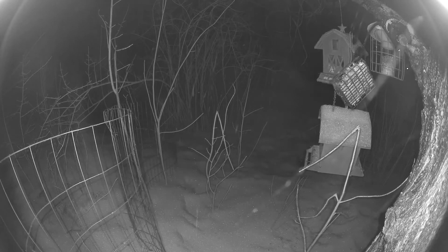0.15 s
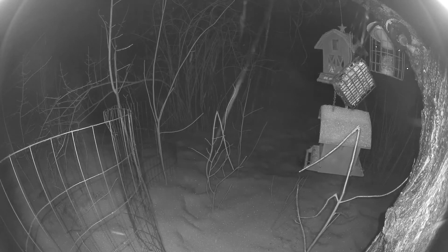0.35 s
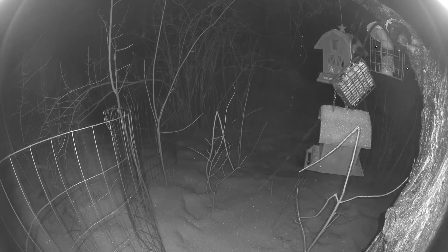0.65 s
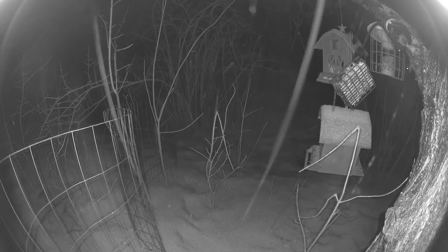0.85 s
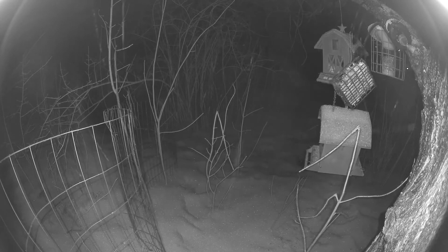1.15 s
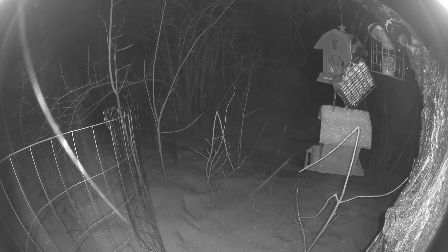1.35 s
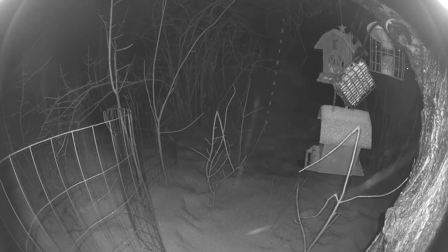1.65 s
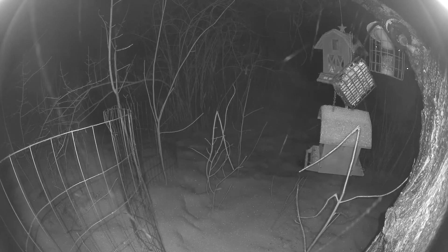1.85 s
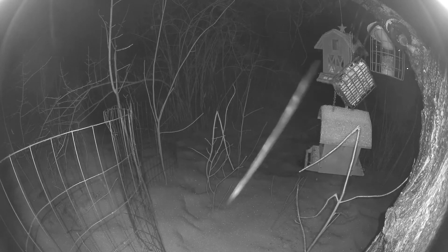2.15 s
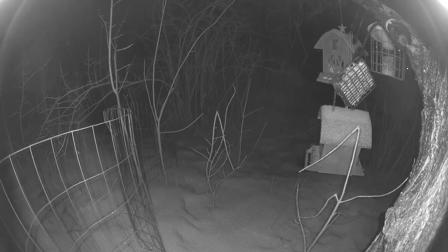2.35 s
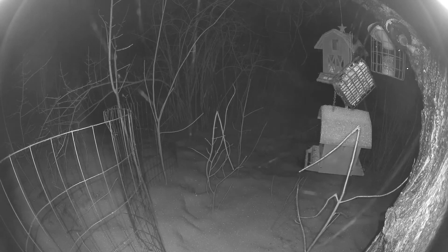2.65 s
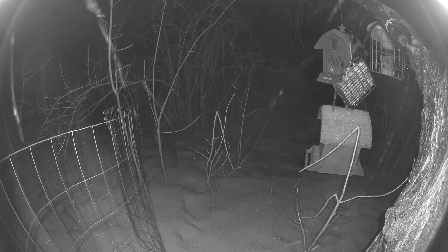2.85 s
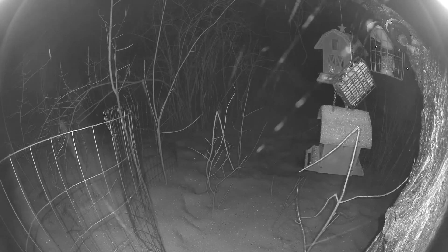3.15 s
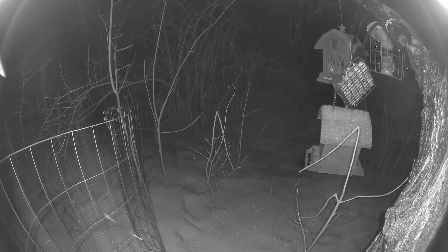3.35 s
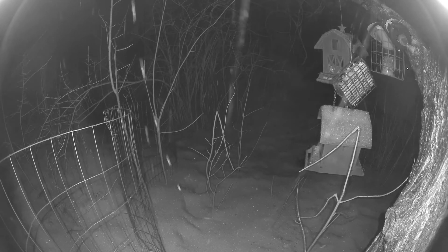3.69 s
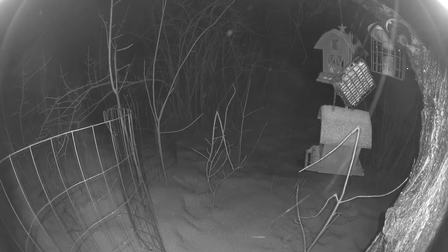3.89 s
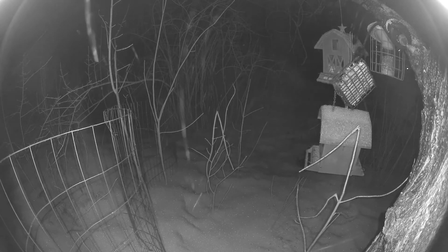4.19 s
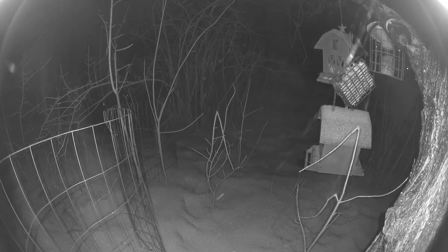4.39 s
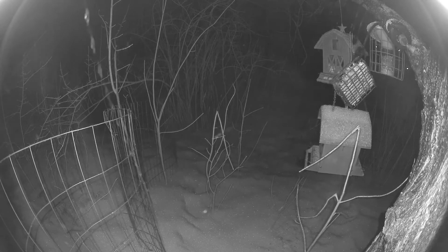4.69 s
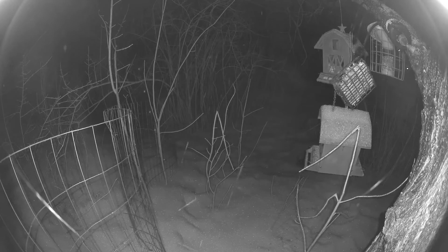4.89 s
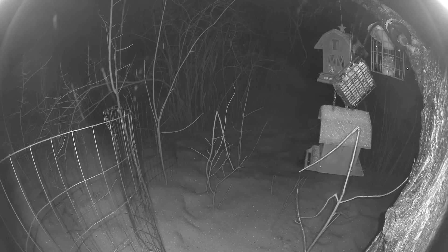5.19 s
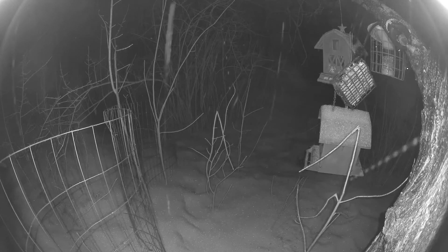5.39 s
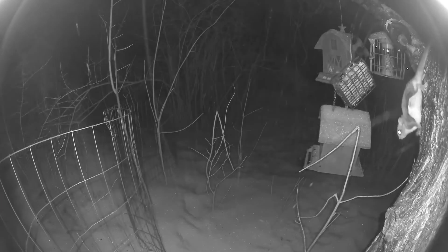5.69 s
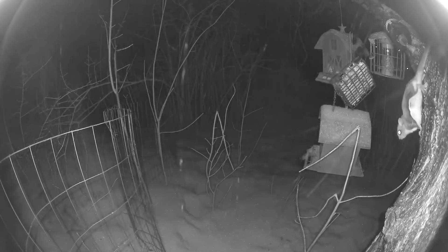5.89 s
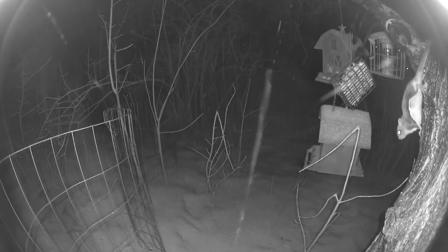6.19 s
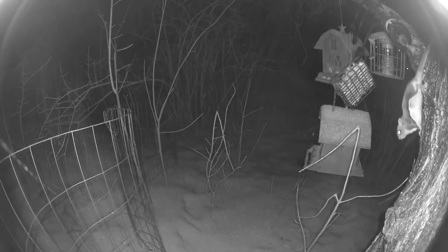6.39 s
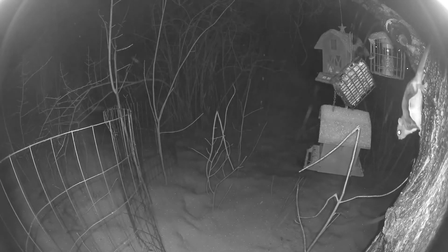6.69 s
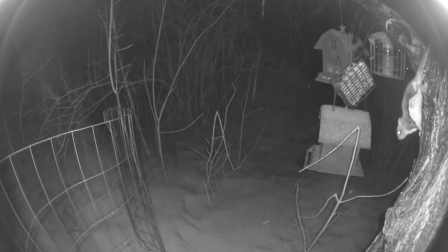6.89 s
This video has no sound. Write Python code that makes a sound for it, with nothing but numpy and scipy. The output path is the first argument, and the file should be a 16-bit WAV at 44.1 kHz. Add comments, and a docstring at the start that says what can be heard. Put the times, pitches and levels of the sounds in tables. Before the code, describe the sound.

A night yard in sleet, heard from a small outdoor camera microphone, mono and dull at the top. From the start, hard pellets tick on the plastic housing at uneven intervals, each a tiny bright crack with a short hollow ring. A strong one lands near 0.2 s and another at 1.7 s; a sparser moment follows around 2 s. Loud, snapping hits come at 2.9 s and between 3.2 and 3.6 s, then mostly lighter ticks until 5.4 s. Soft dull pats and faint taps fall nearby over muffled hiss and low distant rumble, the hiss opening briefly after ticks. At 5.4 s everything goes silent for half a second. At 5.9 s the hiss returns louder, with a low roar joining the rumble, and eases after about half a second. Sharp ticks cluster at 6.1 to 6.4 s, then lighter ones continue to about 6.75 s, leaving the steady background at the end.

```python
"""Outdoors at night, sleet ticks on the plastic housing of a camera; softer pellets pat on things nearby.
Ticks, pats and faint taps are resonances driven by short bursts. Behind them lie a low, distant rumble and the
hiss of sleet in the trees, both shaped noise. The camera's noise suppressor turns the treble down, but lets it
through for a moment after each tick. The sound cuts out once for half a second; then the hiss comes back louder
and settles, and the noise just above the rumble stays louder from then on."""
import sys
import numpy as np
from scipy import signal
from scipy.fft import rfft, irfft, next_fast_len
from scipy.io import wavfile
from scipy.ndimage import uniform_filter1d, minimum_filter1d, map_coordinates

SR = 44100
rng = np.random.default_rng(int(sys.argv[2]) if len(sys.argv) > 2 else 0)


def wrap_up_sound(samples):
    """Save the sound to the file named by the first command line argument, as 16-bit audio."""
    columns = np.atleast_2d(samples).T
    # keep every value between -1 and 1, then stretch to whole-number steps
    tamed = np.clip(columns, -1, 1)
    steps = np.round(tamed * 32767).astype(np.int16)
    wavfile.write(sys.argv[1], SR, steps)


N = 310464  # length in samples
TIME = np.arange(N) / SR  # seconds

# when the sound cuts out: start_s, end_s
SILENCE = (5.403, 5.915)


def amp(db):
    """Turn decibels into a gain."""
    return 10 ** (np.asarray(db) / 20)


def unit(x):
    """Scale to an rms (average strength) of 1."""
    return x / np.sqrt(np.mean(x ** 2) + 1e-20)


def match_energy(sound):
    """Give a short sound the energy of 2 ms at rms 1."""
    return sound * np.sqrt(.002 * SR / np.sum(sound ** 2))


def wobble(rate):
    """A smooth random curve through `rate` random points a second."""
    points = rng.standard_normal(int(N * rate / SR) + 4)
    return map_coordinates(points, [TIME * rate])


def filtered(x, response):
    """Multiply each frequency of x by the gain that response(hz) gives."""
    padded = next_fast_len(N + 8192)
    hz = np.fft.rfftfreq(padded, 1 / SR)
    return irfft(rfft(x, padded) * response(hz), padded)[..., :N]


def coloured(x, spectrum):
    """Shape x to a curve of (pitch_hz, level_db) points, at rms 1."""
    points_hz, points_db = np.transpose(spectrum)

    def response(hz):
        return amp(np.interp(np.log(hz + 1), np.log(points_hz), points_db))
    return unit(filtered(x, response))


def ring(push, hz, width_hz, order=2):
    """A resonance answers a push near its own pitch; a narrower one rings longer."""
    edges = np.clip([hz - width_hz / 2, hz + width_hz / 2], 50, SR / 2 - 50)
    b, a = signal.butter(order, edges, "bandpass", fs=SR)
    return match_energy(signal.lfilter(b, a, push))


def add(track, s, sound):
    """Mix a sound into the track at time s (seconds)."""
    part = track[max(round(s * SR), 0):][:len(sound)]
    part += sound[:len(part)]


def ticks():
    """Each pellet that hits the housing drives its parts by an amount set by the landing spot."""
    # pellets on the housing: start_s, contact_s, ping_hz, wall_hz (pitch of the wall at that spot), level_db,
    # then the drive of each part over the ping: back_db, cavity_db, side_db, wall_db, front_db, rim_db
    pellets = [(0.0901, 0.00023, 6920.0, 3950.0, -38.5, -20.5, -27.5, -30, -10.5, -1, -5),
               (0.1276, 0.0015, 5710.0, 4220, -35, -6.5, -8.5, -6.0, -6, -20.5, -35.5),
               (0.1872, 0.0015, 5700.0, 4080, -27, -30.5, -12, -11.5, -12, -4, -22),
               (0.1927, 0.00095, 6570.0, 4210, -13.5, -33, -12.5, -23, -18.5, -18.5, -16.5),
               (0.225, 0.002, 6300, 4500, -44, -16, -7.5, -1, 0, 2.5, -6),
               (0.367, 0.0007, 6970.0, 4370, -24.5, -19, -10, -15.5, -6, -2.5, -3.5),
               (0.4403, 0.003, 6030.0, 4320, -39.5, -24, -2.5, -6.0, 7.5, -11, 2.5),
               (0.7455, 0.00051, 6970.0, 3950, -27.5, -31, -7, -9, -12, -8.0, -0.5),
               (0.773, 0.0003, 5600.0, 4900.0, -44.5, -28, -16.0, -27, 8, 8.5, -13.5),
               (0.8313, 0.002, 6270.0, 4330.0, -37.0, -5.0, -14.5, -15, -1.5, 0, 4.5),
               (0.908, 0.001, 5600.0, 3840.0, -47, -17, -21.5, -29.0, -6, -13.0, 10.5),
               (1.0253, 0.00086, 5720.0, 4320, -24.5, -29, -27, -25, -9.0, -3, -10),
               (1.1355, 0.0015, 7080.0, 3320, -44, -19.5, -24, -30, -2.5, 4.5, 3),
               (1.199, 0.0021, 6540.0, 4000.0, -34, -1, 2, -6.5, 3, -2.5, -31),
               (1.521, 0.0034, 5900, 4300, -41, 6, -1, 1, -2.5, 1.5, -9.5),
               (1.7167, 0.0017, 5960.0, 4020, -18.5, -26, 0, -8.5, 6, 1, 2),
               (1.7961, 0.0017, 5900.0, 3520, -37.0, -30.5, -9.5, -24.0, -2, -7, -1),
               (1.8502, 0.0015, 6860.0, 4290, -23, -18.5, -17, -15.5, -10.5, -2.0, 4),
               (1.941, 0.0038, 6500, 4200, -37, 0.5, 0.5, 2.5, 4, -8, -8.5),
               (2.5834, 0.0015, 6990.0, 4800, -44, -24.0, -10, -23, -5, -25.5, 1),
               (2.6151, 0.0014, 6620.0, 4500, -25.5, -32, -18, -18.5, -3, -14, -19),
               (2.7162, 0.00076, 6460.0, 3530.0, -33, -23.5, -28, -30.5, -13.5, -3.5, -3.5),
               (2.794, 0.0011, 5970.0, 3990.0, -34.5, -32.0, -6.5, -11.5, -2, 6, 0.5),
               (2.8761, 0.00091, 6510.0, 4050, -6.5, -25.5, -18, -9.5, -1, -1.5, -32.5),
               (2.8822, 0.00063, 6840.0, 3390.0, -12.5, -20, -8, -16.0, 2, 8, 8.5),
               (2.9554, 0.00061, 5740.0, 4230, -31.5, -35, -0.5, -10.5, 6.5, -2, -8),
               (3.0804, 0.002, 5770.0, 3780, -28.5, -33, -8, -19, -2, -19.5, -8),
               (3.1319, 0.0017, 6170.0, 4060, -24, -22, -14.5, -29, -10, -9, 1.5),
               (3.1908, 0.0014, 5600.0, 4040, -14.0, -24.0, -3.5, -32, 1.5, -11.5, -31),
               (3.2724, 0.0015, 6870.0, 4130, -22, -29.5, -26, -26, -11.0, -7.5, -31.5),
               (3.2982, 0.0003, 6480.0, 4900.0, -43.5, -31.5, -29, -32.0, -10.5, -7.5, -5.5),
               (3.3273, 0.00045, 6520.0, 5050, -9.5, -33.5, -25.5, -32, -6, -8, -30),
               (3.3687, 0.0007, 6370.0, 3730, -40, -21, -30, -30, -6, 0, -5.5),
               (3.556, 0.00086, 6300.0, 4150.0, -15.5, -30, -23.5, -35, -18, -31, -32.5),
               (3.5634, 0.0005, 5610.0, 3980.0, -33, -13.5, -13, -18, -3.5, -3, -16),
               (3.7212, 0.00064, 6600.0, 4746, -32.5, -33.5, -21.5, -31, -9, -10.5, -1.5),
               (3.7443, 0.00085, 5860.0, 4940, -29, -17, -19, -26, -12.5, -19, -7.5),
               (3.8444, 0.0022, 5880.0, 4790, -43.5, -31, -14.5, -18.5, 1, -21, 0),
               (4.088, 0.0037, 6200, 4010, -41.5, 3.5, 2.5, 3, 0, 3, -14.5),
               (4.2576, 0.001, 6330.0, 4120, -32, -13.5, -8, -3.5, -2, 5.5, 4),
               (4.3875, 0.0003, 5780.0, 4440.0, -35.0, -4.5, -28, -34, -10.5, 5.5, -4.5),
               (4.4756, 0.0015, 6680.0, 4630.0, -45, -10.5, -24.5, -30.0, -15.5, -32.5, -17.0),
               (4.69, 0.003, 5600.0, 3940, -29.5, 6, 9, -6.0, 1, 8, -14),
               (4.8316, 0.00028, 6830.0, 3300.0, -37, -9.5, -1, -11, -5.5, -4, -1.5),
               (4.9334, 0.0023, 6640.0, 4400, -36, -30, -3, -5, 1.5, 3, -16.5),
               (4.959, 0.001, 7030.0, 4360.0, -20, -27.5, -12.5, -18.0, -7.5, -21.5, 1),
               (5.1206, 0.003, 6080.0, 4290.0, -36.5, -32.0, -2.5, -1.5, 1.5, -4.5, 1.5),
               (5.1955, 0.00054, 5820.0, 4230, -17.5, -16, 10.5, -16.5, 14, 1.5, 2.5),
               (5.234, 0.0003, 7090.0, 4380.0, -43, -30.5, -2, 2.5, 3.5, -10.5, -6),
               (5.3187, 0.0018, 7020.0, 3320, -37.5, 1.5, 12.0, 4.5, 5.5, 8.5, -3),
               (5.3892, 0.001, 5600.0, 4770, -29, -11.5, 1.5, -13, 3, -13, -8.5),
               (5.9204, 0.00046, 6190.0, 4180.0, -33, -3.5, 4, -6.0, 2.5, -0.5, -13),
               (6.1289, 0.0011, 6340.0, 3900.0, -14, -27, -16.5, -21, -15.5, -8, -31),
               (6.2002, 0.001, 5870.0, 4010.0, -14.5, -33, -2, -21.0, -4, -4, -3.5),
               (6.2041, 0.00041, 6910.0, 4170, -15, -22.5, -16.5, -12, -1, 9, 0),
               (6.2577, 0.00089, 7000.0, 3520, -17, -30.0, -6.5, -7.5, 1.5, 11, 12.5),
               (6.3021, 0.0014, 6930.0, 3890.0, -35.5, -20.0, -24, -29, 5, -34.5, 3.5),
               (6.359, 0.002, 6260.0, 4220, -15.5, -4.5, -2.5, -4, 0, 6.5, 3.5),
               (6.474, 0.00038, 6050.0, 4620, -29.5, -27, -33, -32.5, -5, -21, -32.0),
               (6.492, 0.0015, 6330.0, 3973, -29.5, -34, -27.5, -31.5, -1, -9.5, -18),
               (6.5036, 0.0017, 6580.0, 4100, -40, -27.0, -17, -22.5, 0, -1.5, -32.0),
               (6.6852, 0.002, 6940.0, 4400, -38.5, -27.5, -2.5, -7, -16.5, -5, -8),
               (6.749, 0.0023, 6590.0, 3880, -38.0, -21.5, -11, -17, 0, 0, 1)]
    out = np.zeros(N)
    for s, contact, ping_hz, wall_hz, db, back_db, cavity_db, side_db, wall_db, front_db, rim_db in pellets:
        drives_db = [back_db, cavity_db, side_db, front_db, rim_db]
        tick = strike(max(contact, 1e-4), ping_hz, wall_hz, wall_db, drives_db)
        add(out, s, amp(db) * tick)
    return out


def strike(contact, ping_hz, wall_hz, wall_db, drives_db, after_db=-28,
           ping_width_hz=1050, wall_width_hz=800, crack_db=-20):
    """One blow sets off a thin crack, a ping and the housing's parts near the landing spot."""
    # resonances of the back, cavity, side, front and rim: pitch_hz, width_hz, level_db
    housing = [(1320, 660, 1), (2200, 430, -1.5), (2920, 950, 1), (5230, 1100, -0.5), (7317, 1000, -0.5)]
    push = crunch(contact, after_db)
    parts = []
    for (hz, width_hz, db), drive_db in zip(housing, drives_db):
        parts.append(amp(db + drive_db) * ring(push, hz, width_hz, order=3))
    back, cavity, side, front, rim = parts
    wall = amp(wall_db) * ring(push, wall_hz, wall_width_hz)
    ping = ring(push, ping_hz, ping_width_hz)
    crack = amp(crack_db) * ring(push, 4740, 5600, order=3)
    # neighbouring resonances swing opposite ways
    return match_energy(crack - rim + ping - front + wall - side + cavity - back)


def crunch(length, after_db):
    """The push of a pellet: one sharp blow, a burst as it crumbles, then a faint shiver of the plastic."""
    crumble_s = 0.00029  # a contact twice this long is half blow, half crumbling
    shiver_t60 = 0.076  # the shiver dies at a rate of 60 dB in this many seconds
    t = np.arange(SR // 40) / SR
    blow = t == 0
    fading = np.exp(-t / length) + amp(after_db - 60 * t / shiver_t60)
    return blow + fading * rng.standard_normal(len(t)) / np.sqrt(crumble_s * SR)


def specks(count=55, level_db=-50, spread_db=5, low_hz=3000, high_hz=7200, width_hz=900, contact=.001):
    """The smallest grains barely tick as they touch the housing, each ringing one random pitch."""
    out = np.zeros(N)
    for when, size, pitch in rng.random((count, 3)):
        hz = low_hz + pitch * (high_hz - low_hz)
        speck = ring(crunch(contact, after_db=-18.5), hz, width_hz)
        add(out, when * N / SR, amp(level_db + spread_db * size) * speck)
    return out


def pats(width_hz=480, level_db=-4.0, t60=0.08, rise_s=0.0027):
    """Pellets on softer things nearby push more gently and give a dull, loose knock."""
    # soft pats: start_s, pitch_hz, relative level_db (the shared level_db is added)
    soft_pellets = [(1.237, 893, -38), (1.522, 1343, -40.5), (1.64, 950, -36), (2.033, 1204, -35.5),
                    (2.327, 1275, -39.5), (3.129, 1042, -33), (3.492, 2200, -39), (3.497, 1027, -32.5),
                    (3.812, 2234, -37), (4.325, 1214, -34.5), (4.73, 1317, -33.5), (4.902, 1084, -39)]
    out, t = np.zeros(N), np.arange(SR // 16) / SR
    for s, hz, db in soft_pellets:
        swell = (1 - np.exp(-t / rise_s)) * amp(-60 * t / t60)
        push = swell * rng.standard_normal(len(t))
        add(out, s - rise_s, amp(db + level_db) * ring(push, hz, width_hz))
    return out


def patter(count=300, level_db=-61, spread_db=7.0, centre_hz=1900, t60=0.025, width_share=.7):
    """Many faint pellets land farther off, each a short, dull tap at its own pitch."""
    out, t = np.zeros(N), np.arange(SR // 32) / SR
    for when, size, pitch in rng.random((count, 3)):
        push = amp(-60 * t / t60) * rng.standard_normal(len(t))
        db = level_db + spread_db * min(-np.log(1 - size), 2)  # mostly faint, a few stronger
        hz = centre_hz * 2 ** (3 * pitch - 1.5)  # up to an octave and a half either way
        add(out, when * N / SR, amp(db) * ring(push, hz, width_share * hz))
    return out


def hiss(level_db=-46, surge_db=6.5, patch_db=2.2):
    """An even hiss, as of sleet in the trees; small patches waver in level, as noise suppression leaves them."""
    # overall colour of the hiss: pitch_hz, level_db (per Hz)
    hiss_colour = [(300, -29.5), (1200, -6), (2400, 1), (4500, 2), (7000, -1), (8000, 5)]
    # how the housing colours the hiss that reaches the microphone: pitch_hz, width_hz, lift_db
    hiss_peaks = [(1000, 130, 7.5), (1300, 180, 3.5), (2112, 71, 1), (2800, 110, 2.5), (3380, 130, 0.5),
                  (4605, 190, 0.5), (5480, 64, 2), (6600, 450, -2)]
    # every small patch of time and pitch gets its own level
    z = signal.stft(rng.standard_normal(N), nperseg=1024)[2]
    field = uniform_filter1d(rng.standard_normal(z.shape), size=2, axis=0)
    field = uniform_filter1d(field, size=7, axis=1)
    patchy = signal.istft(z * amp(patch_db * unit(field)), nperseg=1024)[1][:N]

    def lift(f):
        return amp(sum(db / (1 + (2 * (f - hz) / width_hz) ** 2) for hz, width_hz, db in hiss_peaks))
    sound = unit(filtered(coloured(patchy, hiss_colour), lift))
    return amp(level_db + surge_db * surge(hold_s=0.43, fade_s=0.19)) * sound


def rumble(low_db=-48, roar_db=-47, roar_surge_db=5.5, waver_db=0.84):
    """The low, steady noise of the far surroundings; after the silence a band an octave or two higher is
    louder, most of all at first."""
    # the rumble: pitch_hz, level_db (per Hz)
    rumble_colour = [(20, -33), (50, -34), (80, -20), (100, -10.5), (127, 2), (160, -4), (260, -4),
                     (420, -7.5), (560, -12), (800, -15), (1300, -19.5), (2200, -23.5), (4000, -44.5),
                     (8000, -52.5)]
    # the roar, an octave or two higher: pitch_hz, level_db (per Hz)
    roar_colour = [(100, -24.5), (200, -0.5), (350, -0.5), (460, -3.5), (650, -15.5), (1200, -25.5)]
    low = amp(low_db) * coloured(rng.standard_normal(N), rumble_colour)
    roar_level = amp(roar_db + roar_surge_db * surge(hold_s=0.22, fade_s=0.077))
    roar = roar_level * coloured(rng.standard_normal(N), roar_colour)
    after_silence = TIME > SILENCE[1]
    return amp(waver_db * wobble(12)) * (low + roar * after_silence)


def surge(hold_s, fade_s):
    """1 when the sound comes back from the silence; it holds, then fades to 0."""
    since = TIME - SILENCE[1]
    return (since > 0) * np.clip(1 - (since - hold_s) / fade_s, 0, 1)


def scene():
    """Add up all the sounds; one microphone feeds both channels."""
    mono = ticks() + specks() + pats() + patter() + rumble() + hiss()
    return np.array([mono, mono])


def suppress(x, corner_hz=2300, threshold_db=5, knee_db=9, depth_db=-8.5, hold=0.065, fade=0.0038):
    """Each treble band is turned down unless it rises over its usual level; a tick holds it open a moment."""
    hz, t, z = signal.stft(x, SR, nperseg=384, noverlap=288)
    power = uniform_filter1d(np.abs(z[0]) ** 2, size=3, axis=1)
    power = uniform_filter1d(power, size=3, axis=0)
    level = 10 * np.log10(np.abs(power) + 1e-20)
    usual = np.median(level, axis=1, keepdims=True)
    opening = np.clip((level - usual - threshold_db) / knee_db, 0, 1)
    # keep the widest opening of the last `hold` seconds
    half = int(hold / t[1] / 2)
    held = -minimum_filter1d(-opening, 2 * half + 1, axis=1, origin=half)
    # it opens at once and closes gradually
    pole = np.exp(-t[1] / fade)
    held = np.maximum(held, signal.lfilter([1 - pole], [1, -pole], held))
    treble = hz[:, None] ** 4 / (hz[:, None] ** 4 + corner_hz ** 4)
    gain = amp(depth_db * treble * (1 - held))
    return signal.istft(z * gain, SR, nperseg=384, noverlap=288)[1][:, :N]


def limit(x):
    """A fast limiter turns the hardest ticks down, with a gain that glides over about 2 ms."""
    needed = np.minimum(1, .9 / (np.abs(x[0]) + 1e-9))
    lowest = minimum_filter1d(needed, size=89)
    return x * uniform_filter1d(lowest, size=89)


def record(dry, roll_hz=7480, top_hz=8274):
    """Noise suppression, the brief silence, limiting and the camera's narrow band."""
    live = (TIME < SILENCE[0]) | (TIME > SILENCE[1])
    limited = limit(suppress(dry) * live)

    def band(hz):
        # steep fall from roll_hz, nothing from top_hz up
        return (hz < top_hz) / np.sqrt(1 + (hz / roll_hz) ** 80)
    return filtered(limited, band)


dry = scene()
out = record(dry)
wrap_up_sound(out)
```